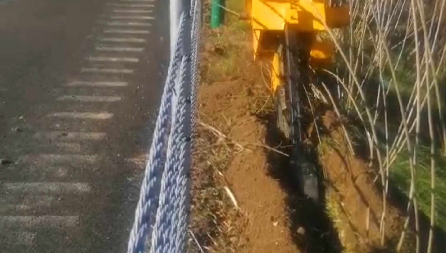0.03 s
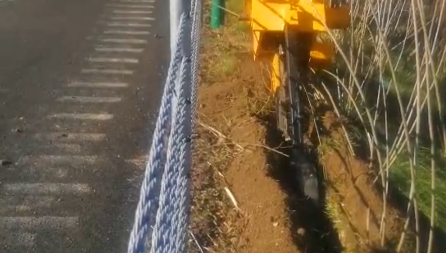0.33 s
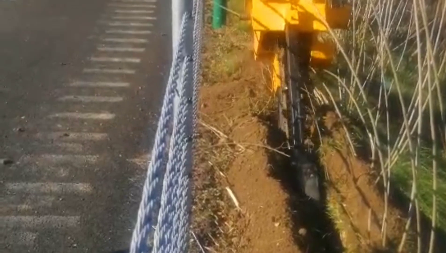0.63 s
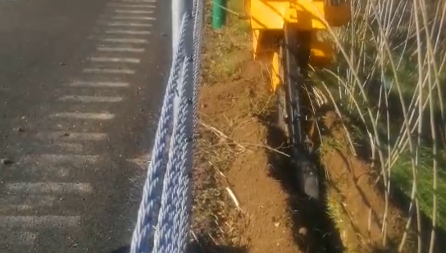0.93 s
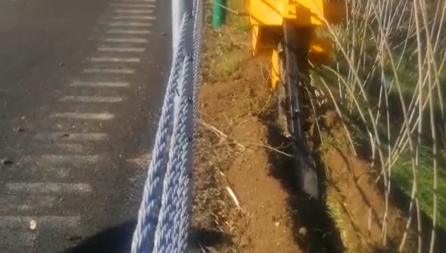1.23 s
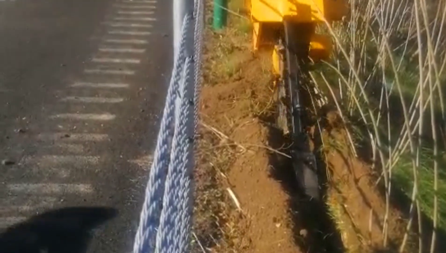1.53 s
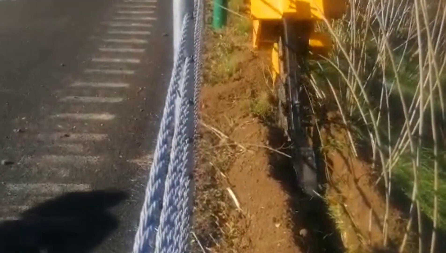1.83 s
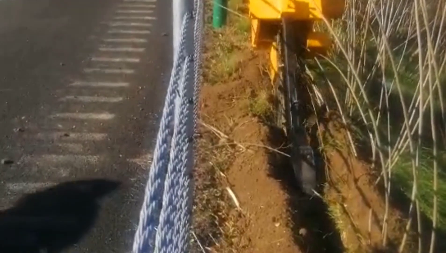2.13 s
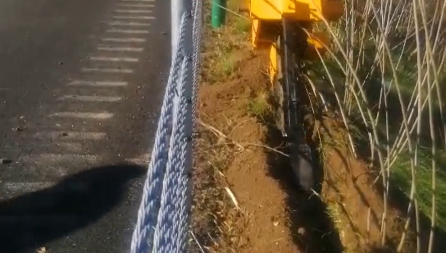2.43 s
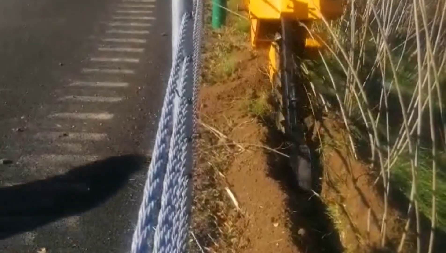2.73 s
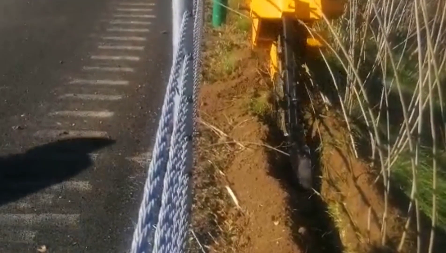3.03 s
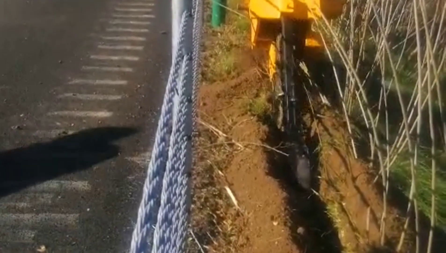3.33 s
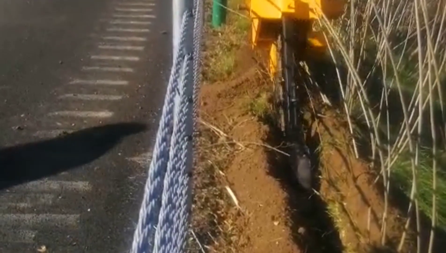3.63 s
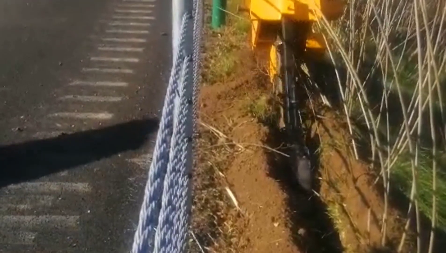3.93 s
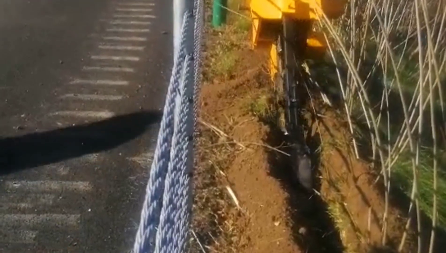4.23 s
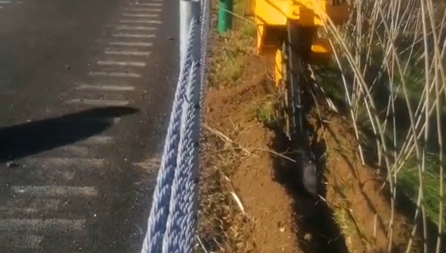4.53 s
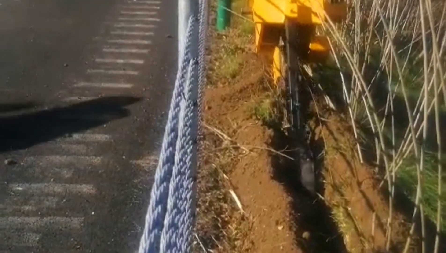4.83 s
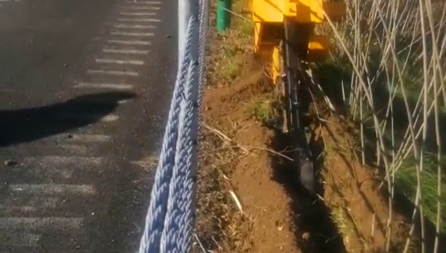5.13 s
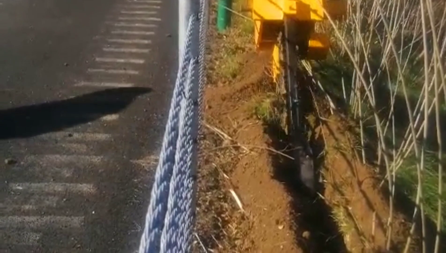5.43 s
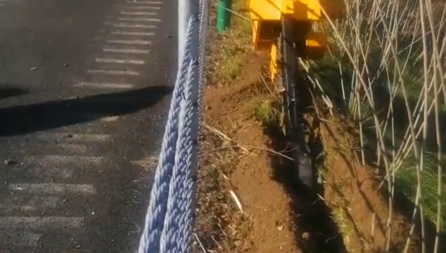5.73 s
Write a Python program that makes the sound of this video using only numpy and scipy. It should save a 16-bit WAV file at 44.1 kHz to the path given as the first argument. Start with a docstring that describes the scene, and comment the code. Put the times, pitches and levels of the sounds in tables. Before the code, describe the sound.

Continuous metal chain rattle, stone clanks and gritty soil crunch over the steady engine drone of a trenching machine outdoors.

```python
"""A chain trencher digs dry soil beside a road, a few metres from a two-port stereo microphone.
Its engine drones at a governed speed; the chain rattles over the sprocket, snags and clanks on stones,
squeaks at its dry pins and groans twice as it drags. The teeth crunch through the ground, ping on flints
and throw up hissing batches of soil. Near the middle the chain runs briefly free and the rattle drops.
Reflections from the road and the trench walls hollow out a few bands of the noise."""
import sys
import numpy as np
from scipy import signal
from scipy.fft import rfft, irfft, next_fast_len
from scipy.io import wavfile
from scipy.ndimage import uniform_filter1d

SR = 44100
rng = np.random.default_rng(int(sys.argv[2]) if len(sys.argv) > 2 else 0)


def int16_out(signal):
    """Quantize to a 16-bit WAV file."""
    q = np.round(np.clip(np.atleast_2d(signal).T, -1, 1) * 32767)
    wavfile.write(sys.argv[1], SR, q.astype(np.int16))


N = 263277
TIME = np.arange(N) / SR
FREQ = np.fft.rfftfreq(2 * next_fast_len(N // 2 + 4096), 1 / SR)

# soil breaking down in the trench: (frequency [Hz], relative level [dB])
CRUNCH_SPECTRUM = [(100, -27), (250, -18), (420, 4), (650, 5), (850, 2.5), (1050, -1.5), (1500, 0),
                   (2150, -0.5), (3000, -1.5), (4000, -5.5), (6000, -6.5), (16000, -36)]
# gravel and stone snapping: (frequency [Hz], relative level [dB])
SNAP_SPECTRUM = [(800, -19), (2300, -5), (3000, -3), (4200, 3), (5500, 8), (9000, 7), (13000, -6),
                 (16000, -28)]
# teeth and links strike stones:
# (time [s], relative level [dB], share of dull knock [dB], share of dry snap [dB], crack's t60 [s])
STONE_STRIKES = [(0.0365, -4, -11, -16, 0.011), (.109, -10, -15, -19, 0.016), (0.1293, -10, 3, -11, 0.017),
                 (0.2467, -9.5, -7, -16, 0.015), (0.3147, -12.5, -17, -16, 0.0099),
                 (.3508, -14, -12, -3, 0.016), (.476, -17, 10, -8, 0.031), (0.614, -6.5, 1.5, -18, 0.012),
                 (0.676, -7, -6, -4, 0.0061), (0.8736, -7, 5.5, -15, 0.019), (.9242, -9, 5, -14, 0.014),
                 (0.9806, -12, -5, -11, .011), (1.003, -8, -4, -6, .012), (1.021, -10, -2, -8, .026),
                 (1.0688, -6.5, 2, -23, 0.018), (1.1776, -14, -15, -17, 0.014),
                 (1.2016, -10, -5, -10, 0.016), (1.23, -14, -9, -14, .012), (1.2544, -10.5, -5, -10, .012),
                 (1.283, -12, -11, -8, 0.012), (1.315, -11, 3, -3, .014), (1.3873, -7, 3, -17, .017),
                 (1.415, -12, -1, -9, 0.015), (1.451, -7.5, -23, -14, 0.014), (1.5022, -18, 2, -3, 0.011),
                 (1.552, -14, 2, 0, .01), (1.5815, -10, 2, -9, .01), (1.6046, -14, 4, -12, 0.0076),
                 (1.651, -13, -5, -11, 0.02), (1.6815, -11, 3, -2, 0.02), (1.689, -8, 0, -8, 0.01),
                 (1.7, -10.5, 1, -18, .017), (1.792, -2, -18, -8, .009), (1.796, -13, -12, -6, 0.0064),
                 (1.8212, -19.5, 8, 0, .01), (1.871, -11, 1, -10, .012), (1.9221, -12.5, 9, -9, .011),
                 (1.9487, -8, -3, -3, 0.022), (2.114, -14, -4, 0, 0.012), (2.1246, -9.5, -8, -10, .008),
                 (2.256, -9.5, -16, -2, 0.018), (2.3157, -9, -22, -6, .004), (2.6607, -10, -0.5, -9, 0.037),
                 (2.7349, -20.5, -6, 5, 0.011), (2.8025, -6, -6, -1, .02), (2.8253, -8, -1, -14, 0.015),
                 (2.8435, -12, -7, -18, 0.015), (2.9206, -13, -13, -10, .005), (3.0804, -9, -8, -4, .006),
                 (3.1495, -12, -3, -6, 0.015), (3.167, -10, -2, -10, 0.011), (3.1902, -12.5, 0, -14, 0.021),
                 (3.225, -11, 7, -13, 0.014), (3.339, -9, -16, -19, 0.0098), (3.4113, -7, -15, -17, 0.011),
                 (3.4327, -12, 8, -17, 0.02), (3.572, -8, 4, -12, .014), (3.61, -7.5, 5, -8, 0.029),
                 (3.6462, -8.5, -9, -3, 0.012), (3.6637, -11, 6, 7, .0082), (3.8209, -12.5, 9, -13, 0.0195),
                 (3.898, -10.5, 2.5, -18, 0.021), (3.9376, -14, 4, -5, 0.011),
                 (3.9607, -9.5, -20, -12, 0.02), (3.9998, -10.5, -1, -5, 0.014), (4.053, -30, 4, -1, 0.013),
                 (4.145, -8.5, -16, -17, .016), (4.2873, -9.5, -5, -18, 0.016),
                 (4.3043, -11.5, 8, -4, 0.013), (4.533, -8, -12, -22, 0.013), (4.6797, -18, -14, -10, 0.02),
                 (4.7092, -13, 4, 3, 0.019), (4.8016, -14, -2, -12, 0.0096), (4.8285, -12, -7, -10, .011),
                 (4.9073, -5.5, 4.5, -23, .018), (4.986, -9.5, 5, -14, 0.026), (5.192, -4, -11, -11, 0.015),
                 (5.2216, -11, -15, -17, .01), (5.2675, -8, -1, -16, .0056), (5.306, -21, 7, -7, .009),
                 (5.3876, -17, 6, -10, .011), (5.416, -9, 4, -12, 0.0067), (5.4617, -20, 2, -8, .015),
                 (5.5408, -5, -24, -15, .016), (5.567, -9, -17, -10, 0.0071), (5.5929, -9, -18, -7, 0.015),
                 (5.6174, -14, -8, -8, 0.0086), (5.6881, -13, 5.5, -14, 0.014),
                 (5.8196, -11.5, -3, -10, 0.01), (5.8665, -13, -20, -14, 0.017),
                 (5.9414, -16, -4, -3, 0.009)]


def amp(db):
    """Decibels to gain."""
    return 10 ** (np.asarray(db) / 20)


def unit_rms(x):
    """Scales to rms 1."""
    return x / np.sqrt(np.mean(x ** 2) + 1e-20)


def over_freq(points):
    """A table of (frequency [Hz], value) at every frequency of FREQ."""
    hz, value = np.transpose(points)
    return np.interp(np.log(FREQ + 1), np.log(hz + 1), value)


def over_time(points):
    """A table of (time [s], value) at every sample."""
    return np.interp(TIME, *np.transpose(points))


def add(mix, s, sound):
    """Adds a sound into the mix at s seconds."""
    part = mix[..., max(round(s * SR), 0):][..., :sound.shape[-1]]
    part += sound[..., :part.shape[-1]]


def spectrum_of(x):
    """Spectrum on the FREQ grid."""
    return rfft(x, 2 * (len(FREQ) - 1))


def wander(hz):
    """Smooth random drift of rms 1, up to about the given rate."""
    return unit_rms(irfft(spectrum_of(rng.standard_normal(N)) / (1 + (FREQ / hz) ** 4))[:N])


def swell(middle, length):
    """Rises from 0 to 1, holds briefly and falls back; half height at the ends of its length."""
    return 1 / (1 + (2 * (TIME - middle) / length) ** 4)


def dying(kicks, t60):
    """Envelope of rms 1 in which each kick of power falls 60 dB in t60 seconds."""
    decay = np.exp(-2 * np.log(1000) / (t60 * SR))
    return unit_rms(np.sqrt(signal.lfilter([1], [1, -decay], kicks) + 1e-12))


def grit(per_s, spread_db, t60):
    """Envelope of random grains breaking, a few of them large."""
    size_db = spread_db * np.minimum(rng.exponential(1, N), 4)
    return dying(amp(size_db) ** 2 * (rng.random(N) < per_s / SR), t60)


def recoloured(force, patchy_db):
    """Each contact lands on another spot, so for a moment it favours other resonances."""
    frames = signal.stft(force, nperseg=256)[2]
    chance = rng.standard_normal((2,) + frames.shape[1:])
    narrow = uniform_filter1d(uniform_filter1d(chance[0], size=3, axis=0), size=5, axis=1)
    broad = uniform_filter1d(uniform_filter1d(chance[1], size=22, axis=0), size=3, axis=1)
    patches = unit_rms(unit_rms(narrow) + unit_rms(broad))
    return signal.istft(frames * amp(patchy_db * np.minimum(patches, 2)), nperseg=256)[1][:, :N]


def at_microphone(forces, response):
    """Two forces radiate through a frequency response and reach the two ports, partly alike."""
    # between the ports: (frequency [Hz], left minus right [dB])
    balance = [(270, -0.5), (350, -0.5), (520, 3), (630, 9), (780, 17.5), (1080, -2.5), (1520, 5),
               (2100, -8.5), (2800, 1), (3750, 4), (5400, 2.5), (8300, 2.5), (11500, 9.5), (14500, -2.5)]
    # likeness of the ports: (frequency [Hz], coherence [0..1])
    likeness = [(200, 0.88), (260, 1), (335, 0.18), (390, 0.87), (640, 0.78), (780, 0.63), (1000, 0.73),
                (2000, 0.74), (3000, 0.61), (4800, 0.22), (6500, 0.22), (9000, 0.066), (16000, 0.081)]
    # how far the left port leads: (frequency [Hz], phase [rad])
    left_lead = [(265, 0), (335, .4), (380, 1.4), (450, 1.45), (520, 2.3), (750, 2.8), (830, 5.9),
                 (1170, 7.2), (1750, 6.2), (2300, 7.5), (2950, 9.5), (3900, 10.1), (4300, 13.4), (5200, 13),
                 (6500, 18.8), (8500, 25)]
    # bands cancelled by road and trench wall reflections: (frequency [Hz], width [Hz], depth [dB])
    notches = [(548, 23, -12), (1167, 42, -0.5), (1752, 44, -6), (2940, 48, -9.5), (5520, 530, -2),
               (7360, 320, -3.5)]
    left, unrelated = spectrum_of(forces)
    same = np.clip(over_freq(likeness), 0, 1)
    right = (same * left + np.sqrt(1 - same ** 2) * unrelated) * np.exp(-1j * over_freq(left_lead))
    tilt = amp(over_freq(balance))
    ports = np.array([left * tilt, right]) / np.sqrt(1 + tilt ** 2)
    path = amp(sum(db / (1 + (2 * (FREQ - hz) / width) ** 2) for hz, width, db in notches))
    return irfft(ports * response * path)[:, :N]


def rush(envelope, response, patchy_db=0):
    """Countless tiny contacts under an envelope; the mean of the two ports has rms 1."""
    forces = envelope * rng.standard_normal((2, N))
    if patchy_db:
        forces = recoloured(forces, patchy_db)
    ports = at_microphone(forces, response)
    return ports / np.std(ports.mean(0))


def scattered(direct, t60):
    """A sound thrown back by the machine and the trench walls, differently for each port."""
    t = np.arange(3000) / SR
    taps = rng.standard_normal((2, len(t))) * amp(-60 * t / t60)
    return signal.fftconvolve(direct[None], taps / np.linalg.norm(taps[0]), axes=1)[:, :N]


def governor(governed_hz=62.14, off_pipe_hz=62.8, hunt_hz=14.4):
    """The governor hunts around one speed: firing cycles run, and dB of the note and the overtones."""
    # engine speed: (time [s], firing rate [Hz])
    firing_rate = [(0.0, 63.04), (0.55, 61.9), (1.0, 62.5), (1.47, 62.2), (1.7, 62.86), (2.1, 61.97),
                   (2.4, 62.4), (2.7, 60.7), (2.9, 61.46), (3.02, 62.93), (3.5, 62.4), (3.68, 64.85),
                   (4.05, 61.9), (5.1, 62.53), (5.24, 63.8), (5.4, 61.7), (5.55, 63.65), (5.97, 61.03)]
    firing_hz = over_time(firing_rate)
    cycles = np.cumsum(firing_hz + 0.29 * wander(hunt_hz)) / SR
    note_db = -27.5 - (firing_hz - governed_hz)  # faster, it gets less fuel: 1 dB softer per Hz
    off_pipe_db = -4.5 * np.maximum(firing_hz - off_pipe_hz, 0)  # faster, the third overtone leaves the exhaust pipe's resonance near 183 Hz: the bark weakens
    return cycles, note_db, -33 + off_pipe_db + 2 * wander(hunt_hz)


def engine(cycles, note_db, overtone_db, pipe_lag_rad=0.842, block_db=-35):
    """Firing pulses, smeared by the exhaust pipe, make the drone; the block adds noise at each firing."""
    # exhaust overtones: (multiple of the firing rate, relative level [dB])
    overtones = [(2, -10), (3, 2), (4, -14), (5, -19), (6, -17.5)]
    # noise of exhaust and engine block: (frequency [Hz], relative level [dB])
    block_spectrum = [(20, -32), (50, -1), (100, -7), (150, -1.5), (195, 1.5), (235, 6), (275, -2),
                      (360, -16.5), (520, -2.5), (680, 0), (950, -16), (2000, -34), (8000, -18),
                      (16000, -64)]
    angle = 2 * np.pi * cycles
    note = amp(note_db) * (1 + 0.044 * wander(25)) * np.cos(angle)
    bark = sum(amp(db) * np.cos(k * (angle + pipe_lag_rad * (k - 1))) for k, db in overtones)
    bark *= amp(overtone_db) * (1 + 0.13 * wander(24))
    puffs = rush(1 + 0.57 * np.cos(angle), amp(over_freq(block_spectrum)))
    return np.sqrt(2) * (note + bark) + amp(block_db) * puffs


def ground_load(clod_db=1.33, clod_hz=15, snag_s=0.012, snag_db=-1.5):
    """Load in dB, uneven from clod to clod; it dips while the chain snags just before each stone strike."""
    # how hard the teeth bite: (time [s], load [dB])
    bite = [(0.0, -17), (0.08, -29.5), (0.16, -25), (0.3, -28), (0.65, -26), (1.4, -26.5), (1.85, -28.5),
            (2.33, -29.5), (2.52, -32), (2.74, -33.5), (2.84, -24.5), (3.6, -24), (4.02, -30),
            (5.33, -28.5), (5.46, -26), (5.97, -33.5)]
    snags = sum((TIME > s - snag_s) & (TIME <= s) for s, *_ in STONE_STRIKES)
    return over_time(bite) + clod_db * wander(clod_hz) + snag_db * snags


def link_seating(links_per_s=40, spread_db=2.5):
    """Envelope of the links seating on the sprocket, each with its own force."""
    # the chain falls behind its steady pace where it drags: (time [s], lag [links])
    lag = [(0, .1), (.9, 0.0038), (1.7, .1), (2.8, .2), (3.3, 0.44), (4.3, 0.52), (4.8, .3), (5.2, 0.64),
           (5.97, 0.54)]
    passed = links_per_s * TIME - over_time(lag) + 0.07 * wander(30)
    seated = np.diff(np.floor(passed), prepend=0) > 0
    strength = amp(spread_db * np.clip(wander(55), -2, 1))
    force = dying(seated * strength ** 2, t60=0.06)
    return uniform_filter1d(force, size=60)  # packed soil cushions the blow


def steel_response():
    """The steel chain and boom answer a blow with a broad spectrum and short ringing modes."""
    # broad sound of the chain: (frequency [Hz], relative level [dB])
    broad = [(150, 0.5), (600, 4), (1000, -0.5), (2100, -3), (3000, -17), (3900, -12), (5000, -3),
             (5700, -8.5), (7200, 3.5), (8400, 6), (10200, 1.5), (12500, -5.5), (14000, -20), (16000, -70)]
    # ringing of chain and boom: (frequency [Hz], width [Hz], level over the broad spectrum [dB])
    modes = [(3760, 190, 6.5), (4500, 43, 7), (4790, 87, 9), (6510, 80, 1), (9070, 82, -2), (12470, 140, 2),
             (13220, 260, 7.5)]
    ringing = sum(amp(db) / (1 + 2j * (FREQ - hz) / width) for hz, width, db in modes)
    return amp(over_freq(broad)) * (1 + ringing)


def chain_rattle(seating, drive_db):
    """Seating links and grit crushed between them both ring the steel."""
    crushing = grit(per_s=1500, spread_db=2.0, t60=0.034)
    envelope = np.hypot(amp(-8) * seating, amp(-5.5) * crushing)
    gain = amp(drive_db) * np.sqrt(np.mean(envelope ** 2))
    return gain * rush(envelope, steel_response(), patchy_db=3.1)


def gravel(drive_db):
    """Grains of gravel snap between the links in dry, separate ticks."""
    snaps = grit(per_s=130, spread_db=2.4, t60=0.007)
    return amp(drive_db - 15.5) * rush(snaps, amp(over_freq(SNAP_SPECTRUM)), patchy_db=5.5)


def teeth_crunch(seating, drive_db):
    """The teeth break up clods and gravel down in the trench, jerked along by each link."""
    breaking = grit(per_s=1100, spread_db=1.7, t60=0.085)
    envelope = np.hypot(breaking, amp(-4) * seating)
    return amp(drive_db - 4) * rush(envelope, amp(over_freq(CRUNCH_SPECTRUM)), patchy_db=2.5)


def pebbles(seating, drive_db, per_s=260, ring_cycles=120, low_hz=900, high_hz=9500):
    """Pebbles tick against teeth and plates as the links seat; each part rings briefly at its own pitch."""
    ticks, t = np.zeros((2, N)), np.arange(3000) / SR
    times = TIME[rng.random(N) < per_s * seating / SR]
    for s, (pitch, luck, left_phase, right_phase) in zip(times, rng.random((len(times), 4))):
        hz = low_hz * (high_hz / low_hz) ** pitch
        size_db = 3 * min(-np.log(luck), 3)  # a few pebbles are large
        cycles = hz * t + np.array([[left_phase], [right_phase]])
        add(ticks, s, amp(size_db - 60 * t * hz / ring_cycles) * np.sin(2 * np.pi * cycles))
    return amp(drive_db - 11) * unit_rms(ticks)


def clanks(ring_db=-11, knock_db=-18, rebound_db=-7, chatter_db=-4, chatter_stretch=5.3):
    """A blow knocks in the trench, snaps the stone and rings the chain; it rebounds and links chatter."""
    ring, knock, snap = np.zeros((3, N))
    t = np.arange(4096) / SR
    rebound_shares = rng.uniform(0.18, 0.4, len(STONE_STRIKES))
    for (s, db, dull_db, snap_db, t60), share in zip(STONE_STRIKES, rebound_shares):
        rebound_s = share * t60
        rebound = (t > rebound_s) * amp(rebound_db - 60 * abs(t - rebound_s) / t60)
        cracks = amp(-60 * t / t60) + rebound
        chatter = amp(chatter_db - 60 * t / (chatter_stretch * t60))
        envelope = np.hypot(cracks, chatter)
        add(ring, s, amp(db + ring_db) * envelope)
        add(knock, s, amp(db + dull_db + knock_db) * envelope)
        add(snap, s, amp(db + snap_db + ring_db) * cracks)
    stone = amp(over_freq(CRUNCH_SPECTRUM)) * FREQ / np.hypot(FREQ, 1600)  # small stones: little bass
    parts = [(ring, steel_response()), (knock, stone), (snap, amp(over_freq(SNAP_SPECTRUM)))]
    return sum(np.std(part) * rush(part, response, patchy_db=3) for part, response in parts)


def stick_slip(slips, jitter_hz, flutter_db, flutter_hz):
    """Stick-slip tones that glide in an arch, with a shaky pitch and strength."""
    tones, shake, grip = np.zeros(N), wander(flutter_hz), np.minimum(wander(flutter_hz), 1)
    for s, length, middle_hz, glide_hz, droop_hz, db, octave_db in slips:
        span = np.flatnonzero((TIME >= s) & (TIME < s + length))
        position = np.linspace(-1, 1, len(span))
        hz = middle_hz - droop_hz * position ** 2 + glide_hz * position / 2 + jitter_hz * shake[span]
        angle = 2 * np.pi * np.cumsum(hz) / SR
        envelope = amp(db + flutter_db * grip[span]) * np.cos(np.pi * position / 2)
        tones[span] += envelope * (np.sin(angle) + amp(octave_db) * np.sin(2 * angle))
    return tones


def pin_squeaks():
    """Dry pins stick and slip, a little left of centre; the squeaks arrive direct and scattered."""
    # slipping pins: (time [s], length [s], middle pitch [Hz], glide [Hz], droop at both ends [Hz],
    # relative level [dB], share of the octave [dB])
    slips = [(.216, .014, 3700, -100, 40, -27, -13), (.228, .036, 3200, -300, -40, -24, -13),
             (.279, .016, 5780, -200, 60, -25, -17), (.655, .023, 3600, -100, 50, -31, -15),
             (1.07, .024, 5130, 330, 70, -15, -17), (1.09, .014, 5220, -120, 40, -21, -15),
             (1.93, .024, 3780, 100, 50, -27, -11), (2.148, .055, 4330, 170, 130, -26, -3),
             (2.225, .044, 5360, -300, 140, -26, -15), (2.25, .016, 5170, -260, 20, -21, -15),
             (2.256, .026, 8000, -300, -80, -23, -20), (2.568, .017, 3700, 330, 120, -24, -6),
             (2.62, .054, 4270, -170, 120, -20, -10), (2.754, .032, 5030, -230, 110, -20, -24),
             (2.759, .013, 3650, -300, 40, -25, -12), (2.842, .024, 5200, 100, 130, -22, -16),
             (2.966, .032, 4200, 60, 110, -27, -3), (3.299, .017, 3580, -260, 90, -17.5, -12),
             (3.645, .013, 4920, -100, 60, -23, -18), (4.18, .021, 3880, 200, 90, -25, -1),
             (4.305, .031, 3530, -260, 20, -30, -3), (4.359, .022, 4820, -50, 60, -18.5, -18),
             (4.674, .03, 4150, -450, 70, -21.5, -2), (4.696, .02, 3680, -450, 0, -26, -8),
             (4.948, .034, 3700, -130, 110, -33, -3), (5.217, .011, 4950, -200, 60, -19.5, -15),
             (5.238, .015, 9260, -60, 70, -13, -30), (5.394, .028, 3600, 520, 70, -31, -12),
             (5.435, .041, 4100, 300, 130, -35, -6), (5.61, .023, 4980, -100, 60, -28, -15)]
    direct = stick_slip(slips, jitter_hz=65, flutter_db=3.5, flutter_hz=420)
    return amp(-0.34) * (direct + amp(-7) * scattered(direct, t60=0.045)) * amp([[0], [-3]] + 0 * direct)


def soil_spray(edge_s=0.022, dust_db=-62):
    """Fine dry soil thrown off the chain hisses down in batches, over a little drifting dust."""
    # batches of soil: (middle time [s], length [s], relative level [dB])
    throws = [(.68, 0.23, -33), (1.56, 0.25, -39.5), (2.272, 0.19, -36), (2.985, 0.18, -32.5),
              (3.35, 0.62, -40), (3.738, 0.25, -39), (4.499, 0.26, -36.5), (5.29, 0.43, -38.5)]
    airborne = amp(dust_db)
    for middle, length, db in throws:
        inside_s = length / 2 - abs(TIME - middle)
        airborne = airborne + amp(db) * (1 + np.tanh(inside_s / (2 * edge_s))) / 2
    # hiss of falling soil: (frequency [Hz], relative level [dB])
    hiss_spectrum = [(1000, -10), (5000, 9), (9000, 14.5), (12000, 18.5), (14000, 10), (16000, 6.5)]
    falling = grit(per_s=5500, spread_db=5.5, t60=0.022)
    return amp(3) * airborne * rush(falling, amp(over_freq(hiss_spectrum)))


def chain_groans():
    """The dragging chain judders in the cut with a low, rough note."""
    # judders: (time [s], length [s], middle pitch [Hz], glide [Hz], droop at both ends [Hz],
    # level [dB], share of the octave [dB])
    judders = [(.69, .062, 275, -175, 4, -24, -12), (.966, .078, 348, -10, 22, -29, -15)]
    direct = stick_slip(judders, jitter_hz=18, flutter_db=3, flutter_hz=160)
    return direct + amp(-8) * scattered(direct, t60=0.06)


def flint_pings(t60=0.065):
    """A tooth struck by a flint rings briefly before the soil damps it, a little right of centre."""
    # glancing flints: (time [s], pitch [Hz], relative level [dB])
    flints = [(.755, 2240, -25), (.876, 2320, -21), (1.582, 2230, -26), (1.999, 2120, -27),
              (2.091, 2240, -28), (2.279, 2120, -30), (2.343, 2080, -26), (2.768, 1870, -28.5),
              (3.818, 1973, -26), (4.241, 2193, -24), (4.907, 2730, -25)]
    rings, t = np.zeros(N), np.arange(4096) / SR
    for s, hz, db in flints:
        add(rings, s, amp(db - 60 * t / t60) * np.sin(2 * np.pi * hz * t))
    return rings * amp([[-1], [1]])


def stone_scrapes():
    """Change in dB of the crunch, mostly a rise, while a tooth drags across a buried stone."""
    # dragging teeth: (middle time [s], length [s], change of level [dB])
    drags = [(0.899, 0.014, 3.5), (1.695, .03, 1), (3.066, 0.035, 5.5), (3.78, 0.012, 7.5),
             (4.624, 0.084, 5), (4.867, 0.033, -1), (5.1, 0.029, 7.5), (5.266, 0.036, -0.5),
             (5.49, 0.067, 2.5)]
    return sum(db * swell(middle, length) for middle, length, db in drags)


def scene():
    """The trencher from the roadside: the load of the ground sets the rattle and the crunch."""
    load_db = ground_load()
    running_free = swell(middle=2.47, length=0.15)
    rattle_db = load_db - 15 * running_free
    crunch_db = load_db - 8 * running_free + stone_scrapes()  # running free, the teeth meet less soil
    seating = link_seating()
    drone = engine(*governor())
    steelwork = chain_rattle(seating, rattle_db) + clanks() + pin_squeaks() + chain_groans()
    stones = gravel(rattle_db) + pebbles(seating, rattle_db) + flint_pings()
    soil = teeth_crunch(seating, crunch_db) + soil_spray()
    return drone + steelwork + stones + soil


def record(dry, ceiling=0.88, edge_hz=16050):
    """The recorder rounds off the very highest peaks, then cuts the treble above its band limit."""
    rounded = dry / (1 + (dry / ceiling) ** 6) ** (1 / 6)
    lowpass = signal.firwin(1023, edge_hz, window=("kaiser", 10), fs=SR)
    return signal.oaconvolve(rounded, lowpass[None], "same")


dry = scene()
out = record(dry)
int16_out(out)
```